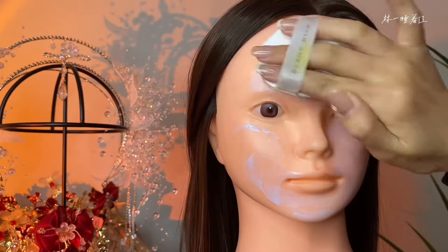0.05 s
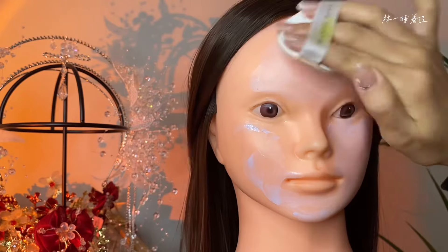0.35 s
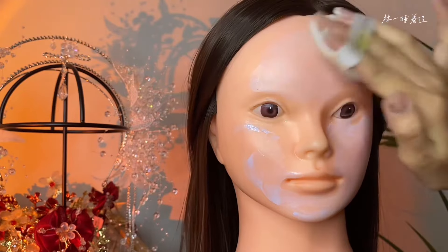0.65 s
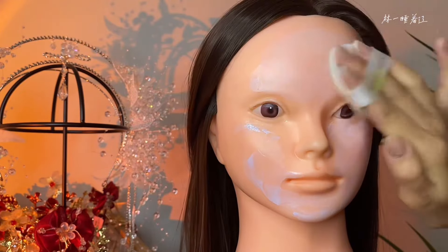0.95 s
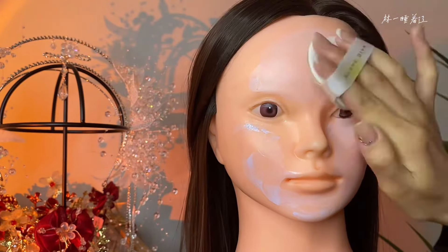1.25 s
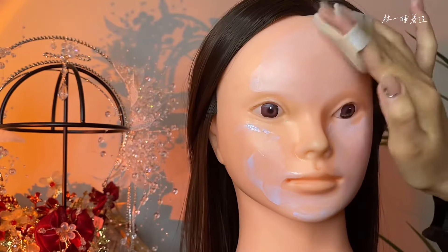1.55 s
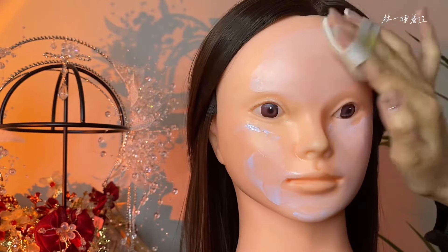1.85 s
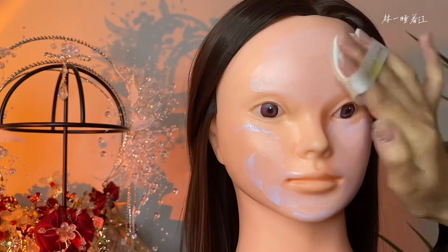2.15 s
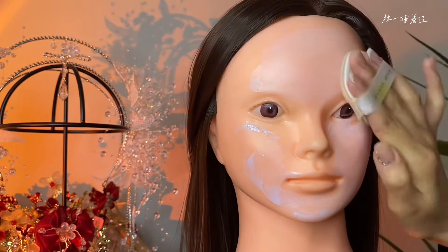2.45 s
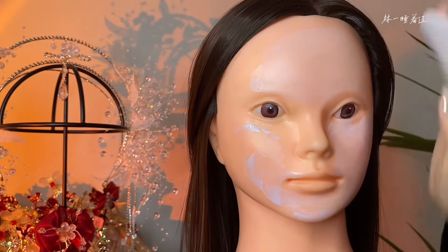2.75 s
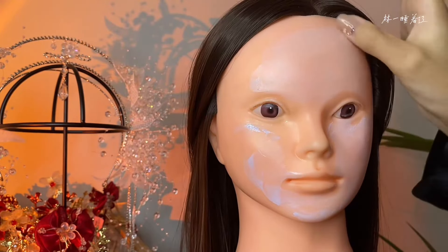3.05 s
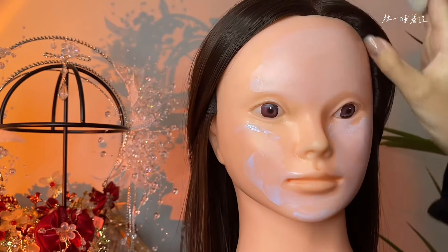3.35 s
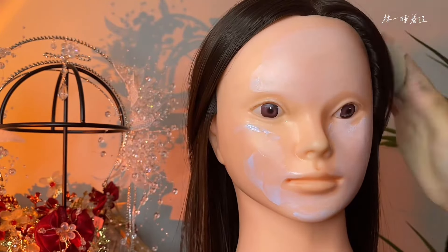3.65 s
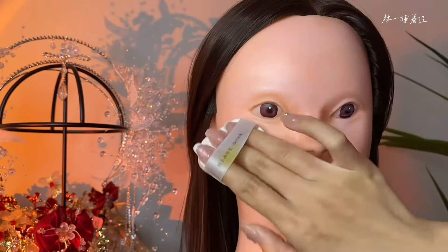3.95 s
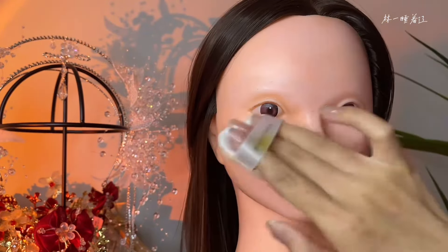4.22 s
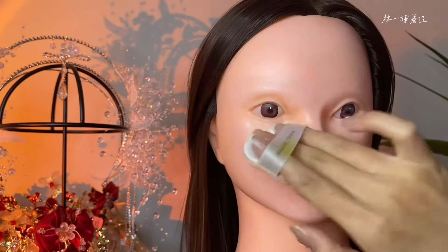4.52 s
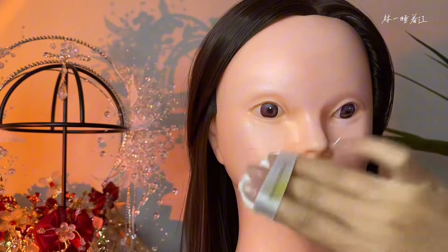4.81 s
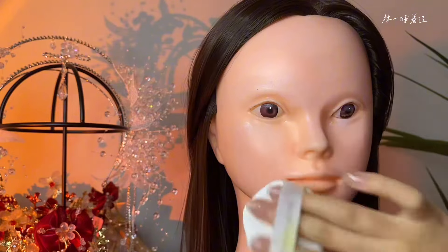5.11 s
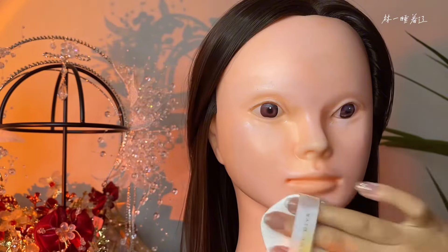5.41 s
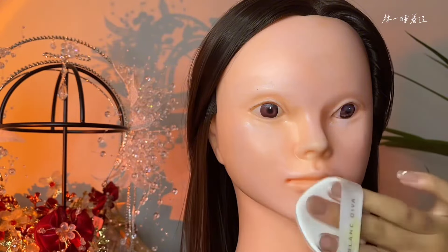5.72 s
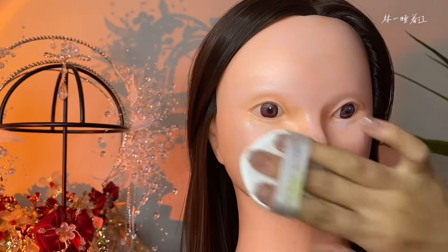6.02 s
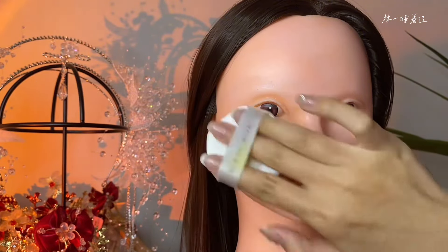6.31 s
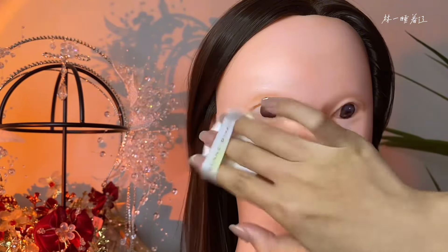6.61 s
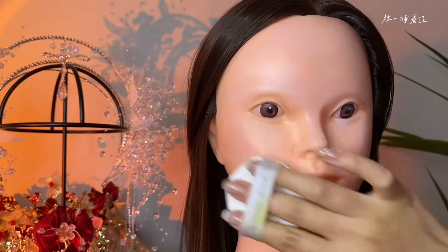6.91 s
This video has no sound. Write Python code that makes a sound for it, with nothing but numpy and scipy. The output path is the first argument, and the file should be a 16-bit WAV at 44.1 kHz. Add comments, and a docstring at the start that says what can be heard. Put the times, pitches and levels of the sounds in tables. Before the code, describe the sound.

A damp makeup puff pats quickly on a hollow mannequin head with tiny sticky crackles, pauses, then returns with firmer pats and soft scuffs.

```python
"""A tiny sticky crackle, then quick soft pats: a damp makeup puff on a hollow mannequin head, close by
in a small quiet room. Each pat smacks, thumps the head and pushes air at the microphone.
On the forehead, threads of tacky cream crackle as the puff peels away. A finger brushes the hair
aside and the sound drops out for a moment. Then, on cheek and chin, the pats are firmer and drier,
with soft scuffs between them."""
import sys
import numpy as np
from scipy import signal
from scipy.fft import rfft, irfft
from scipy.io import wavfile
from scipy.ndimage import uniform_filter1d

SR = 44100
rng = np.random.default_rng(int(sys.argv[2]) if len(sys.argv) > 2 else 0)


def wrap_up_sound(samples):
    """Save the sound to the file named by the first command line argument, as 16-bit audio."""
    columns = np.atleast_2d(samples).T
    # keep every value between -1 and 1, then stretch to whole-number steps
    tamed = np.clip(columns, -1, 1)
    steps = np.round(tamed * 32767).astype(np.int16)
    wavfile.write(sys.argv[1], SR, steps)


N = 307377
TIME = np.arange(N) / SR
DROPOUT_START_S, DROPOUT_END_S = 3.96, 4.007
GRIP_RIPPLE_DB = 5.5  # each grip on the puff colours the sound a little differently


def gain(db):
    """Turn decibels into a number to multiply by."""
    return 10 ** (np.asarray(db) / 20)


def add(out, start_s, sound):
    """Mix a sound in at the given time."""
    start = int(round(start_s * SR))
    sound = sound[max(-start, 0):N - start]
    start = max(start, 0)
    out[start:start + len(sound)] += sound


def set_level(sound, db, seconds):
    """Scale a sound so that its energy, spread over the given time, has this average level."""
    return sound * gain(db) * np.sqrt(seconds * SR / (np.sum(sound ** 2) + 1e-18))


def colour(sound, points, ripple_db=0, size=2048, ripple_points=60):
    """Make each frequency louder or softer as a table says; ripple adds chance peaks and dips."""
    hz, db = np.transpose(points)
    freqs = np.fft.rfftfreq(size, 1 / SR)
    bumps = rng.uniform(-1, 1, ripple_points)
    ripple = np.interp(np.sqrt(freqs / freqs[-1]), np.linspace(0, 1, ripple_points), bumps)
    outline = np.interp(np.log(freqs + 1), np.log(hz), db) + ripple_db * ripple
    # build the filter so that it rings only after a click, never before
    cepstrum = irfft(np.log(gain(outline)))
    cepstrum[1:size // 2] *= 2
    cepstrum[size // 2 + 1:] = 0
    return signal.fftconvolve(sound, irfft(np.exp(rfft(cepstrum))))


def clicks(count, per_second, spread_db):
    """Tiny clicks of uneven size at random moments."""
    present = rng.random(count) < per_second / SR
    signs = rng.choice([-1, 1], count)
    return present * signs * gain(spread_db * np.clip(rng.standard_normal(count), -2, 2))


# the hush of the room (frequency [Hz], level [dB])
HUSH_COLOUR = [(12, -22.5), (20, 4), (88, -8), (269, -19.5), (387, -21), (484, -23), (1060, -28.5),
               (5820, -36), (15900, -39)]
# air stirred by the hand (frequency [Hz], level [dB])
DRAUGHT_COLOUR = [(15, 12.5), (45, -7), (80, -5), (150, -19.5), (260, -22.5), (500, -28), (1500, -36),
                  (16000, -82)]


def background(swing_lag_s=0.04, half_swing_s=0.11):
    """The room's quiet hush, and a low flutter of air as the hand swings for each pat and scuff."""
    hush = set_level(colour(rng.standard_normal(N), HUSH_COLOUR, size=8192)[:N], 0, N / SR)
    draught = set_level(colour(rng.standard_normal(N), DRAUGHT_COLOUR, size=8192)[:N], 0, N / SR)
    moves = [(at, pat_levels(at, pop, smack)["draught"]) for at, pop, smack, *_ in PATS]
    moves += [(at, spot_levels(at)[-1]) for at, *_ in SCUFFS]
    swings = np.zeros(N)
    for at, db in moves:
        swing = 1 - ((TIME - at - swing_lag_s) / half_swing_s) ** 2
        swings = np.maximum(swings, gain(db) * swing)
    hush_db = np.where(TIME < DROPOUT_END_S, -59, -59.5)
    return hush * gain(hush_db) + draught * swings


# the echo off the walls (frequency [Hz], time to fade by 60 dB [s], level [dB])
WALL_ECHO = [(147, 0.22, 10), (503, 0.31, -2), (1110, 0.43, -8.5), (3050, 0.6, -7), (7560, 0.28, 0.5),
             (12100, 0.093, 4), (16100, 0.12, -1.5)]


def room_echo(sound, echo_db=-11, build_s=0.00086):
    """Sound bounces off nearby walls in uneven clusters; the highest frequencies die first."""
    hz, fade_s, db = np.transpose(WALL_ECHO)
    freqs, t, noise = signal.stft(rng.standard_normal(SR * 2 // 3), SR, nperseg=256)
    fade_s, db = (np.interp(np.log(freqs + 1), np.log(hz), column)[:, None] for column in (fade_s, db))
    clusters = uniform_filter1d(rng.standard_normal(noise.shape), size=5, axis=1)
    cluster_db = 12 * uniform_filter1d(clusters, size=3, axis=0)
    envelope = gain(db + cluster_db - 60 * t / fade_s) * (1 - np.exp(-t / build_s))
    tail = signal.istft(noise * envelope, SR)[1]
    return signal.fftconvolve(sound, set_level(tail, echo_db, 1 / SR))[:N]


# bubbles bursting in the puff's pores (frequency [Hz], level [dB])
FIZZ_COLOUR = [(1000, -31), (6000, -9.5), (10000, -8), (12000, -6), (13200, -12), (14500, -10),
               (16000, -19)]
# fingers squeeze the puff between pats (middle time [s], fizz level [dB])
FINGER_SQUEEZES = [(6.557, -59.5), (6.942, -64.5)]


def sponge_fizz(pat_half_s=0.014, faint_db=-81.5, cheek_from_s=4, scuff_fizz_db=-9.5):
    """Tiny bubbles burst as the damp puff is squeezed, and faintly all the time from the cheek on."""
    faint = colour(clicks(N, per_second=90, spread_db=3.5), FIZZ_COLOUR, GRIP_RIPPLE_DB)[:N]
    out = set_level(faint, faint_db, N / SR) * (TIME > cheek_from_s)
    presses = [(at + pat_half_s / 2, pat_half_s, pat_levels(at, pop, smack)["fizz"])
               for at, pop, smack, *_ in PATS]
    presses += [(at, half_s, bright + scuff_fizz_db) for at, half_s, _, bright in SCUFFS]
    presses += [(at, pat_half_s, db) for at, db in FINGER_SQUEEZES]
    for at, half_s, db in presses:
        swell = np.hanning(int(2 * half_s * SR))
        bubbles = swell * clicks(len(swell), per_second=1100, spread_db=4)
        fizz = colour(bubbles, FIZZ_COLOUR, ripple_db=8.5, ripple_points=160)
        add(out, at - half_s, set_level(fizz, db, half_s))
    return out


# rustling hair (frequency [Hz], level [dB])
HAIR_COLOUR = [(200, -20), (550, 0), (900, 0.5), (1500, -0.5), (2600, -15), (4200, -9), (8000, -18),
               (12500, -19), (16000, -28)]


def hair_stroke(middle_s=3.26, half_s=0.2, db=-63.5, catch_db=3):
    """Strands catch and slip under a finger in one soft stroke."""
    out = np.zeros(N)
    count = int(2 * half_s * SR)
    catches = gain(catch_db * signal.resample(rng.standard_normal(20), count))
    strands = np.hanning(count) * catches * clicks(count, per_second=1200, spread_db=5)
    add(out, middle_s - half_s, set_level(colour(strands, HAIR_COLOUR, GRIP_RIPPLE_DB), db, half_s))
    return out


# brief rubbery squeaks (middle time [s], half length [s], pitch [Hz], level [dB])
RUBBER_SQUEAKS = [(3.838, 0.014, 473, -46), (4.213, 0.025, 961, -59), (6.703, 0.014, 444, -47)]


def squeaks(glide=0.025, overtone_db=-17, waver=0.082):
    """Rubber sticks and slips, making a wavering note that rises a little."""
    out = np.zeros(N)
    for at, half_s, hz, db in RUBBER_SQUEAKS:
        count = int(2 * half_s * SR)
        wobble = uniform_filter1d(rng.standard_normal(count), size=100) * 10
        pitch_hz = hz * (1 + glide * np.linspace(-1, 1, count) + waver * wobble)
        phase = 2 * np.pi * np.cumsum(pitch_hz) / SR
        tone = np.sin(phase) + gain(overtone_db) * np.sin(2 * phase)
        add(out, at - half_s, set_level(tone * np.hanning(count) ** 2, db, half_s))
    return out


# the puff rubs drier skin (middle time [s], half length [s], dull level [dB], bright level [dB])
SCUFFS = [(4.033, 0.034, -65.5, -68.5), (4.205, 0.035, -77, -69), (4.406, 0.068, -68.5, -58.5),
          (4.571, 0.034, -62, -69.5), (4.718, 0.077, -81, -70.5), (4.946, 0.055, -70, -75),
          (5.285, 0.036, -66, -60.5), (5.341, 0.023, -54, -65), (5.496, 0.032, -69, -58.5),
          (5.724, 0.019, -55, -60.5), (5.896, 0.029, -63.5, -63), (6.307, 0.028, -66, -60.5),
          (6.461, 0.073, -68, -54), (6.517, 0.02, -50, -56), (6.656, 0.055, -52, -54.5),
          (6.764, 0.052, -57.5, -56.5), (6.851, 0.035, -56, -62.5)]
# the dull and bright parts of a scuff (frequency [Hz], level [dB])
DULL_COLOUR = [(120, -6), (350, -3), (600, -1), (950, -3), (1500, -9), (3000, -11.5), (16000, -30)]
BRIGHT_COLOUR = [(300, -12), (1500, -8.5), (2700, 2), (4300, -0.5), (7000, -0.5), (9000, -9), (11000, -26),
                 (16000, -26)]


def scuffs(trim_db=-2):
    """The sliding puff catches on the skin in many tiny clicks that swell and fade."""
    out = np.zeros(N)
    for at, half_s, dull, bright in SCUFFS:
        stroke = np.hanning(int(2 * half_s * SR))
        for points, db in ((DULL_COLOUR, dull), (BRIGHT_COLOUR, bright)):
            catches = stroke * clicks(len(stroke), per_second=1400, spread_db=5.5)
            friction = colour(catches, points, GRIP_RIPPLE_DB)
            add(out, at - half_s, set_level(friction, db + trim_db, half_s))
    return out


# the puff lifts off the cream (let-go time [s], peel before it [s], crackle [dB], snap [dB])
CREAM_PEELS = [(0.0493, 0.048, -52, -51), (0.217, 0.039, -51.5, -55), (0.382, 0.045, -54, -61),
               (0.5427, 0.05, -54, -56), (0.707, 0.053, -52, -53.5), (0.8748, 0.049, -53.5, -60),
               (1.015, 0.036, -56, -66), (1.184, 0.043, -51, -51), (1.354, 0.05, -53, -57.5),
               (1.532, 0.065, -64, -81), (1.625, 0.013, -63, -64.5), (1.787, 0.039, -49, -58),
               (1.9393, 0.036, -47.5, -56.5), (2.0936, 0.041, -48.5, -54), (2.252, 0.041, -47.5, -55),
               (2.406, 0.04, -48.5, -51.5), (2.555, 0.036, -53.5, -58), (2.699, 0.028, -56.5, -58.5)]
# fine, medium and thick threads of cream breaking (frequency [Hz], level [dB])
FINE_THREADS = [(1000, -24), (4000, -10), (7000, -9.5), (9800, -6.5), (12300, 1.5), (13500, -3),
                (16000, -10.5)]
MEDIUM_THREADS = [(300, -7), (1200, -20), (2200, -2), (3200, -7), (3750, 4.5), (4300, -7.5), (5000, 0.5),
                  (7500, -2.5), (9800, -5), (16000, -10.5)]
THICK_THREADS = [(150, 14), (400, -4), (800, 7.5), (1300, 14), (2500, -5), (5000, -3.5), (16000, -29)]


def cream_peels(fine_per_second=6000, usual_crackle_db=-51.5, bunch_db=1.5):
    """Threads of cream break as the puff lifts, the finest first; the last patch lets go with a snap."""
    out = np.zeros(N)
    for at, peel_s, crackle, snap in CREAM_PEELS:
        thick_db = -60 + 1.65 * (crackle - usual_crackle_db)  # tackier cream, louder thick threads
        lift = np.linspace(0, 1, int((peel_s + 0.0042) * SR))
        bunches = gain(bunch_db * signal.resample(rng.standard_normal(16), len(lift)))
        threads = (FINE_THREADS, crackle), (MEDIUM_THREADS, crackle - 1), (THICK_THREADS, thick_db)
        for thickness, (points, db) in enumerate(threads):
            # thicker threads are fewer and hold longer
            tearing = lift ** (1.27 + 0.89 * thickness) * (1 - lift) ** 0.78 * bunches
            breaks = tearing * clicks(len(lift), fine_per_second / 2 ** thickness, spread_db=5)
            crackling = colour(breaks, points, GRIP_RIPPLE_DB, ripple_points=160)
            add(out, at - peel_s, set_level(crackling, db, peel_s))
        for points, db in ((SMACK_COLOUR, snap), (POP_COLOUR, snap - 3)):
            release = colour(contact(settle_db=0.5), points, GRIP_RIPPLE_DB)
            add(out, at, set_level(release, db, seconds=0.015))
    return out


# the notes of the head on its stand (pitch [Hz], time to fade by 60 dB [s], level [dB])
HEAD_NOTES = [(129.2, 0.058, 9.5), (171, 0.031, 0), (256, 0.023, 2.5)]


def head_ring(push_s=0.0041, detune=0.097):
    """The hollow head rings after a soft push, tuned a little differently each time."""
    t = TIME[:SR // 4]
    ring = np.zeros(len(t))
    for hz, fade_s, db in HEAD_NOTES:
        pitch_hz = hz * (1 + detune * rng.standard_normal())
        ring += gain(db - 60 * t / fade_s) * np.sin(2 * np.pi * pitch_hz * t)
    return -ring * (1 - np.exp(-t / push_s))


# the head rocks on its stand as the hand lets go or presses on (time [s], level [dB])
HEAD_ROCKS = [(2.092, -48.5), (2.253, -59), (4.217, -58), (4.678, -67), (4.909, -46.5), (5.285, -59),
              (5.848, -59), (6.43, -50), (6.611, -57)]
# swirls of air behind a pat (frequency [Hz], level [dB])
SWIRL_COLOUR = [(20, 2), (75, 4), (130, -9.5), (220, -12.5), (350, -12), (700, -39), (16000, -96)]


def thumps(head_trim_db=-1, wave_db=-5, usual_wave_hz=20, wave_s=0.025, swirl_db=-13, swirl_s=0.038):
    """Pats and rocking ring the head; each pat also pushes a slow, swirling air wave at the microphone."""
    out, t = np.zeros(N), TIME[:SR // 4]
    for at, pop, smack, _, thump, _ in PATS:
        add(out, at, set_level(head_ring(), thump + head_trim_db, seconds=0.03))
        air_db = pat_levels(at, pop, smack)["air"]
        sway = np.cos(2 * np.pi * usual_wave_hz * rng.uniform(0.6, 1.7) * t)
        wave = -t * np.exp(-t / wave_s) * sway
        add(out, at, set_level(wave, air_db + wave_db, seconds=0.06))
        crests = t * np.exp(-t / swirl_s) * np.minimum(sway, 0) ** 2
        swirls = colour(crests * clicks(len(t), per_second=700, spread_db=4.8), SWIRL_COLOUR)
        add(out, at, set_level(swirls, air_db + swirl_db, seconds=0.06))
    for at, db in HEAD_ROCKS:
        add(out, at, set_level(head_ring(), db + head_trim_db, seconds=0.03))
    return out


# a usual pat on the forehead, cheek, chin and beside the nose
# (start time [s], settling against first touch [dB], pushed air [dB], fizz [dB], hand draught [dB])
FACE_SPOTS = [(0, 3, -41.5, -78, -63), (4, -1.5, -36.5, -65.5, -50.5), (4.8, -2, -40.5, -67, -56.5),
              (6.1, -1.5, -40.5, -69, -60)]


def spot_levels(at):
    """The four levels for the part of the face being patted at this time."""
    return [levels for start_s, *levels in FACE_SPOTS if start_s <= at][-1]


def pat_levels(at, pop_db, smack_db, usual_force_db=-57.5):
    """A harder pat lands flatter, so it settles less, moves more air and fizzes more."""
    settle, air, fizz, draught = spot_levels(at)
    harder_db = (pop_db + smack_db) / 2 - usual_force_db
    return dict(settle=settle - 0.32 * harder_db, air=air + 0.21 * harder_db,
                fizz=fizz + 0.36 * harder_db, draught=draught + 0.21 * harder_db)


def contact(settle_db, settle_s=0.006, usual_table_lag_s=0.00546, table_echo_db=-5, table_echo_s=0.00058):
    """One sharp first touch; then the rest of the puff settles, and a faint echo off the table follows it."""
    t = TIME[:SR // 20]
    landing_s = usual_table_lag_s * rng.uniform(0.89, 1.33)
    table_echo = gain(table_echo_db) * np.exp(-((t - landing_s) / table_echo_s) ** 2)
    settling = (np.exp(-t / settle_s) + table_echo) * clicks(len(t), per_second=9000, spread_db=2.7)
    force = set_level(settling, settle_db, 1 / SR)
    force[0] -= 1  # the first touch
    return force


# the puff lands (time [s], pop [dB], smack [dB], tick [dB], head thump [dB], pop tuning [Hz])
PATS = [(0.1188, -57.5, -58, -77, -56.5, 786), (0.284, -56, -60.5, -78, -59, 810),
        (0.445, -56.5, -57.5, -85, -64, 590), (0.615, -54.5, -59.5, -71, -63, 674),
        (0.7849, -51, -50, -65, -66, 554), (0.941, -78, -66, -83, -66, 560),
        (1.1119, -52, -47, -59.5, -57, 684), (1.2772, -49, -48, -62, -52, 790),
        (1.434, -62.5, -59.5, -85, -63, 620), (1.6948, -52, -54.5, -67, -64, 700),
        (1.8405, -55.5, -50, -63.5, -75, 710), (1.999, -58.5, -54, -84, -70, 840),
        (2.158, -54, -51.5, -67, -48.5, 640), (2.317, -54, -55, -67, -51.5, 674),
        (2.4676, -58.5, -57, -76, -55, 614), (2.6144, -66, -64, -85, -70, 564),
        (4.1296, -43.5, -47, -57.5, -45, 606), (4.3081, -58.5, -54, -76, -61, 510),
        (4.4833, -59.5, -57.5, -66, -56.5, 450), (4.647, -56.5, -53.5, -56.5, -66, 624),
        (4.87, -62, -64, -88, -76, 524), (5.0431, -63.5, -63.5, -76, -51, 550),
        (5.2496, -36.5, -42, -48, -45, 620), (5.463, -39.5, -40.5, -49, -42.5, 656),
        (5.6436, -55, -50, -56.5, -40, 480), (5.8066, -62, -57, -68, -59, 644),
        (5.8158, -49.5, -56, -61.5, -52, 620), (6.168, -52, -48.5, -57.5, -55.5, 600),
        (6.3186, -53.5, -49, -71, -59, 735), (6.4096, -34.5, -26.5, -39.5, -52, 593),
        (6.5751, -40.5, -43.5, -48.5, -43.5, 580), (6.749, -43, -47.5, -61, -40.5, 600)]
# the hollow pop, damp smack and high tick of a pat (frequency [Hz], level [dB])
POP_COLOUR = [(150, -19), (290, -13.5), (400, 0), (590, -2.5), (800, -2.5), (1050, -7), (1600, -12.5),
              (4000, -35.5), (16000, -68)]
SMACK_COLOUR = [(200, -29.5), (1000, -10), (1500, -4.5), (2200, 1.5), (3000, -0.5), (3900, -2), (4700, -11),
                (7000, -26.5), (16000, -57)]
TICK_COLOUR = [(300, -45), (2500, -8.5), (4200, 9), (5000, 4), (6500, 0.5), (8200, -3.5), (9800, -18.5),
               (12000, -16), (16000, -54)]


def pats(tick_boost_db=3, tick_settle_db=6, usual_pop_hz=600):
    """Trapped air pops out, its pitch set by the pocket's size; the damp face smacks and ticks."""
    out = np.zeros(N)
    for at, pop, smack, tick, _, pop_hz in PATS:
        settle = pat_levels(at, pop, smack)["settle"]
        tuned_pop = np.array(POP_COLOUR) * [pop_hz / usual_pop_hz, 1]
        parts = ((tuned_pop, pop, settle),
                 (SMACK_COLOUR, smack, settle),
                 (TICK_COLOUR, tick + tick_boost_db, settle + tick_settle_db))
        for points, db, settle_db in parts:
            hit = colour(contact(settle_db), points, GRIP_RIPPLE_DB / 2)
            add(out, at, set_level(hit, db, seconds=0.015))
    return out


def scene(peel_echo_db=-3, rustle_echo_db=-1):
    """Puff and head in the room; the pats carry furthest into it."""
    patting, peeling = pats(), cream_peels()
    rustling = scuffs() + hair_stroke() + sponge_fizz() + squeaks()
    echo = room_echo(patting + gain(peel_echo_db) * peeling + gain(rustle_echo_db) * rustling)
    return (patting + peeling + rustling + echo + thumps() + background())[None]


def record(dry, top_hz=15900):
    """The sound drops out for a moment just past halfway, and the highest treble is cut."""
    sound_on = (TIME < DROPOUT_START_S) | (TIME > DROPOUT_END_S)
    smooth_switch = uniform_filter1d(sound_on.astype(float), size=500)
    treble_cut = signal.ellip(10, 0.2, 70, top_hz, fs=SR, output="sos")
    return signal.sosfilt(treble_cut, dry * smooth_switch)


dry = scene()
out = record(dry)
wrap_up_sound(out)
```